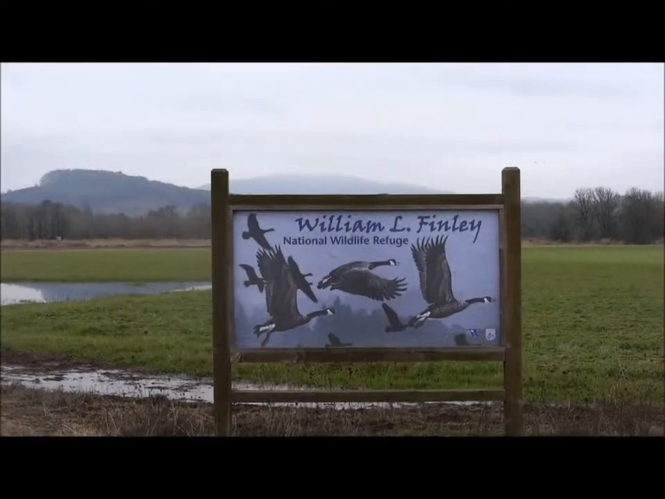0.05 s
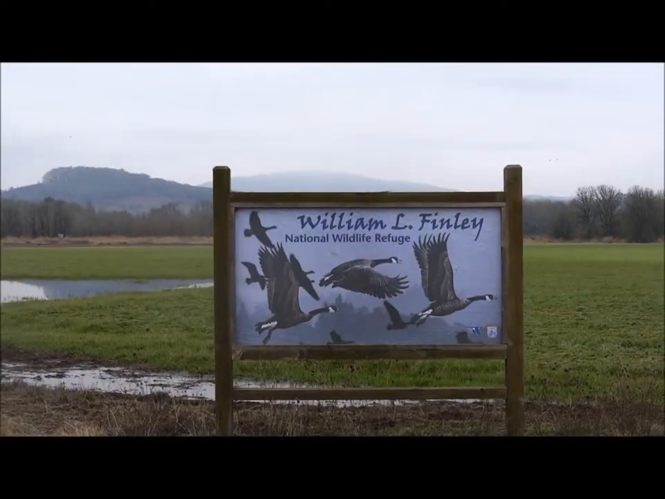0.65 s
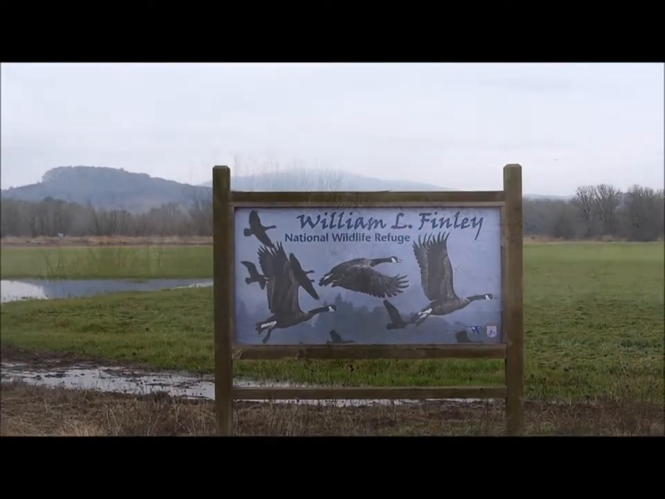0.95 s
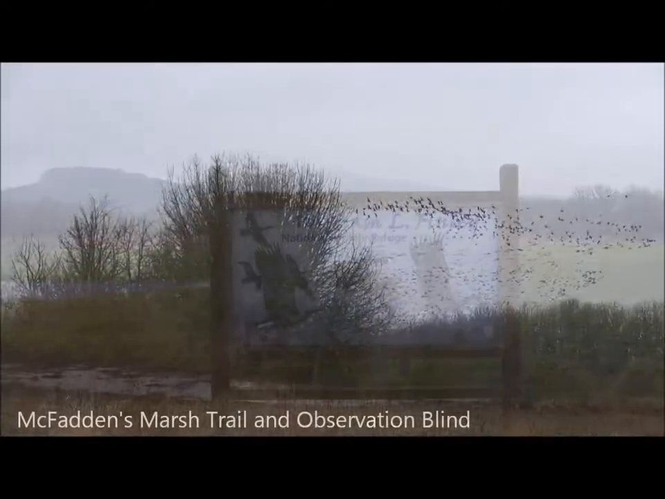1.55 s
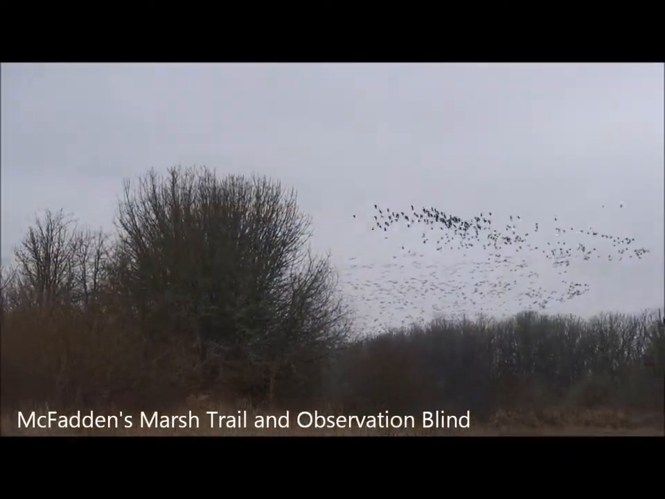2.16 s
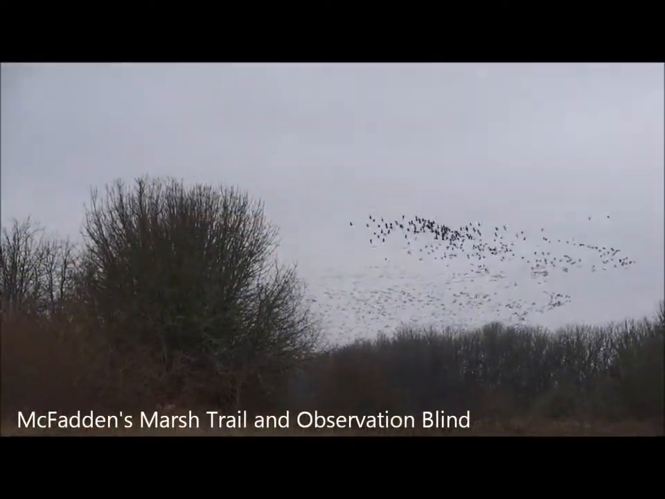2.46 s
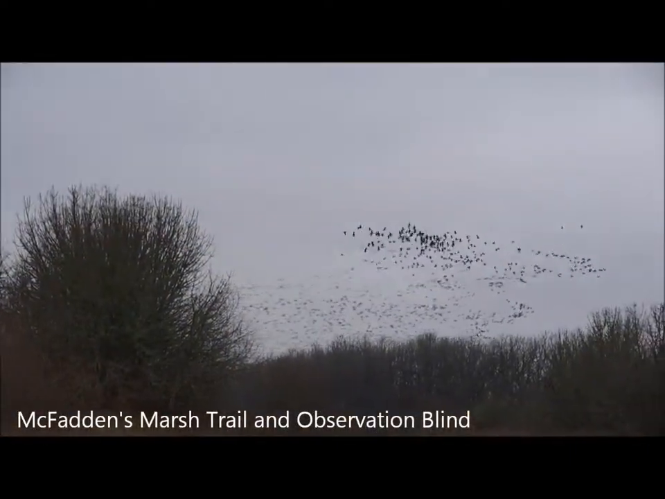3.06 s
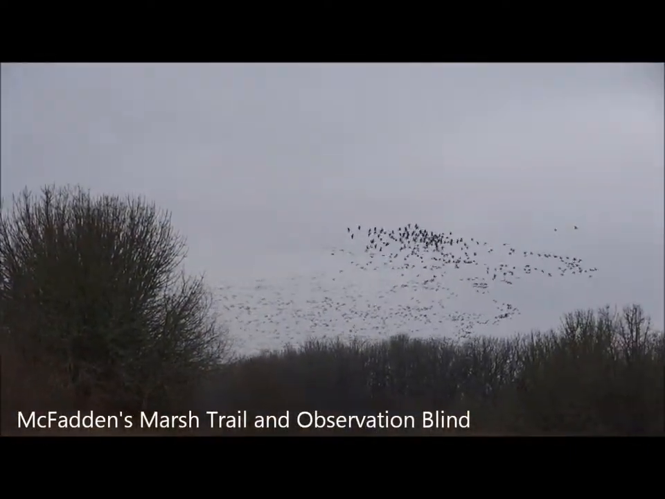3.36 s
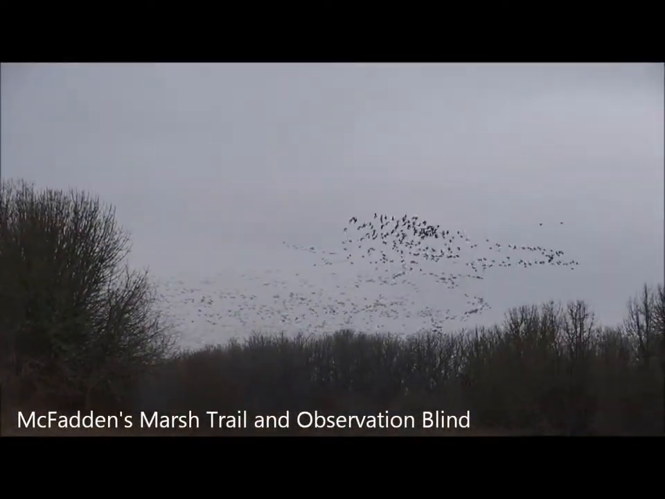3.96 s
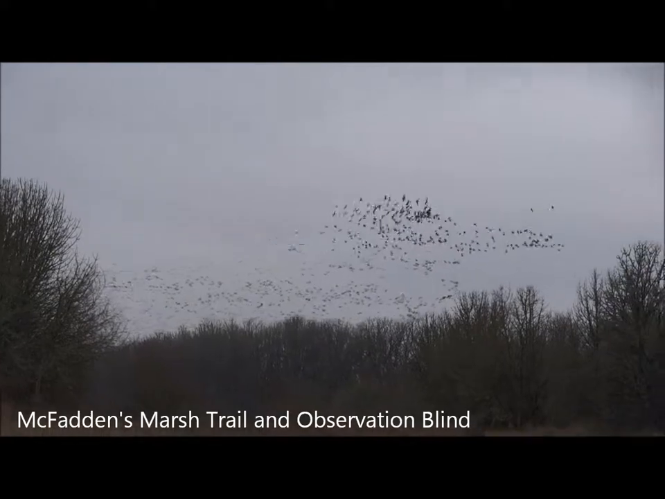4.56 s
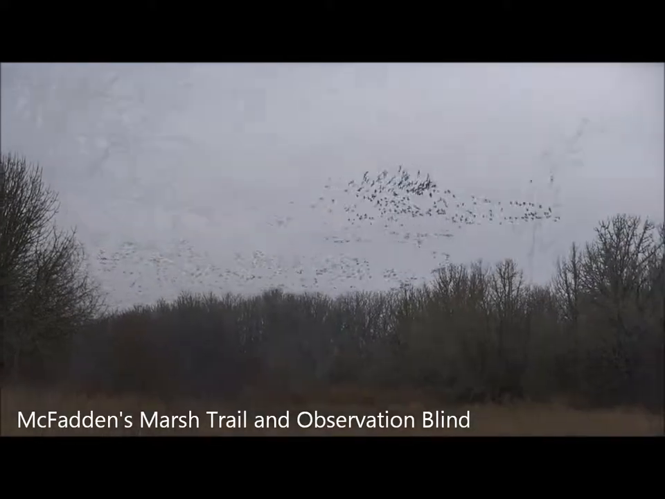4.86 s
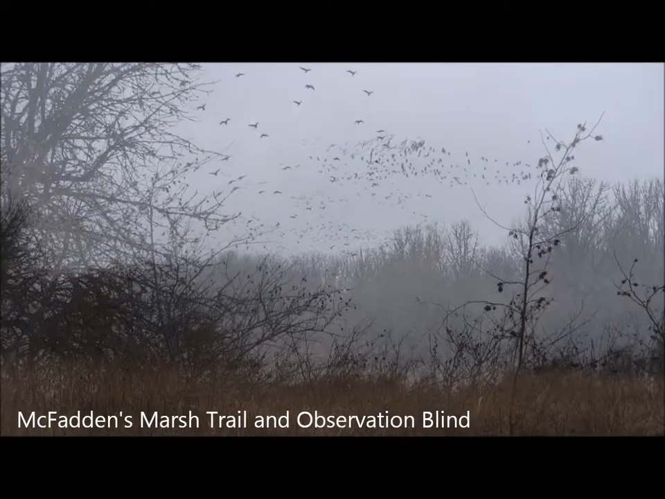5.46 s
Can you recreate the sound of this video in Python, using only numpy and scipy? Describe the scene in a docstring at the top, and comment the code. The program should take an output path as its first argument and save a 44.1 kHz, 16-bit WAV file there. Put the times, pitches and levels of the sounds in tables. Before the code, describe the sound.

A big flock of geese honks nonstop outdoors, jumping from distant to nearer to right overhead, with faint twig ticks and grass rustle.

```python
"""Hundreds of geese honk: first far off across a field, then flying over a marsh, at last close overhead.
Each honk is a harmonic series from the syrinx, arching in pitch and shaped by throat resonance.
The many far voices sum incoherently into a din, and single birds stand out of it.
Twigs tick, dry grass rustles and a small songbird trills faintly, over a few soft bumps,
a low outdoor rumble, a far-off drone and microphone hiss."""
import sys
import numpy as np
from scipy import signal
from scipy.fft import rfft, irfft, next_fast_len
from scipy.io import wavfile
from scipy.ndimage import uniform_filter1d

SR = 44100
rng = np.random.default_rng(int(sys.argv[2]) if len(sys.argv) > 2 else 0)


def transcribe(signal):
    """Save signal, clipped to [-1, 1], as a 16-bit WAV file at the path in sys.argv[1]."""
    frames = np.atleast_2d(signal).T
    limited = np.clip(frames, -1, 1)
    pcm = np.round(limited * 32767).astype(np.int16)
    wavfile.write(sys.argv[1], SR, pcm)


N = 247401
TIME = np.arange(N) / SR
CUTOFF_HZ = 15800
MARSH_S, MARSH_FADE_S = 1.28, .15
OVERHEAD_S, OVERHEAD_FADE_S = 5.27, .07


def from_db(db):
    """Amplitude ratio: tenfold for every 20 dB."""
    return 10 ** (np.asarray(db) / 20)


def unit_rms(x):
    """Normalisation to unit mean power."""
    return x / np.sqrt(np.mean(x ** 2) + 1e-20)


def at_hz(points, hz):
    """Interpolation of a spectrum on a logarithmic frequency axis."""
    freqs, values = np.transpose(points)
    return np.interp(np.log(hz + 1e-3), np.log(freqs), values)


def envelope(rows):
    """Gain interpolated in decibels: exponential growth or decay between points in time."""
    return from_db(np.interp(TIME, *np.transpose(rows)))


def swells(rows, attack_s, release_s):
    """Summed envelopes: each rises linearly up to its start, holds, then decays exponentially."""
    gain = 0
    for start, hold, db in rows:
        rise = np.clip(1 + (TIME - start) / attack_s, 0, 1)
        decay = np.exp(-np.maximum(TIME - start - hold, 0) / release_s)
        gain = gain + from_db(db) * rise * decay
    return gain


def places():
    """Equal-power cross-fades: the gains of the field, the marsh and the spot under the near birds."""
    marsh = np.clip((TIME - MARSH_S) / MARSH_FADE_S, 0, 1)
    overhead = np.clip((TIME - OVERHEAD_S) / OVERHEAD_FADE_S, 0, 1)
    return np.sqrt(1 - marsh ** 2), marsh * np.sqrt(1 - overhead ** 2), overhead


def add(track, start_s, sound):
    """Superposition of a sound on a track, dropping what falls outside."""
    at = int(start_s * SR)
    first, last = max(at, 0), min(at + len(sound), N)
    if last > first:
        track[first:last] += sound[first - at:last - at]


def noise():
    """Two uncorrelated white noises."""
    return rng.standard_normal((2, N))


def waver(length, rate_hz):
    """Random modulation: straight lines between Gaussian values of unit spread."""
    steps = np.arange(length) * rate_hz / SR
    return np.interp(steps % 255, np.arange(256), rng.standard_normal(256))


# Each row: frequency in Hz, correlation of left and right from 0 to 1.
COHERENCE = [(40, 1), (95, 0.99), (160, 0.9), (300, 0.43), (550, 0.8), (1200, 0.98), (12000, 0.79)]

def coloured(pair, spectrum):
    """Spectral shaping and mid-side mixing turn two unrelated signals into stereo of unit power."""
    size = next_fast_len(N + 4096)
    hz = np.arange(size // 2 + 1) * SR / size
    alike = np.clip(at_hz(COHERENCE, hz), 0, 1)
    shaped = rfft(pair, size) * from_db(at_hz(spectrum, hz))
    mid, side = irfft(shaped * np.sqrt([1 + alike, 1 - alike]), size)[:, :N]
    return unit_rms(np.array([mid + side, mid - side]))


# Each row: frequency in Hz, relative spectral density in dB.
HISS_SPECTRUM = [(300, -25), (1000, 24.5), (3000, -35.5), (5000, 2), (10000, 3.5), (15000, 4)]

def hiss(level_db):
    """Microphone self-noise is a stationary random signal."""
    return from_db(level_db) * coloured(noise(), HISS_SPECTRUM)


# Each row: frequency in Hz, relative spectral density in dB.
RUMBLE_SPECTRUM = [(12, -38), (20, -8.5), (86, 5), (116, 0.5), (203, -10), (304, -11.5), (370, -13.5),
                   (450, -22), (580, -14), (990, -120)]
# Levels in dB: in the field, at the marsh, under the near birds.
RUMBLE_LEVELS = (-50, -45.5, -45.5)

def rumble():
    """Outdoor rumble is noise with its power concentrated at low frequencies."""
    gain = sum(from_db(db) * here for db, here in zip(RUMBLE_LEVELS, places()))
    return gain * coloured(noise(), RUMBLE_SPECTRUM)


# Each row: start in seconds, hold in seconds, level in dB.
DRONE_SWELLS = [(4.1, 0.44, -54.5), (4.3, 0.038, -53), (5.35, 0.28, -49.5)]
# Each row: frequency in Hz, relative spectral density in dB.
DRONE_SPECTRUM = [(150, -53), (240, -6), (310, 3), (370, -10), (600, -60)]

def drone():
    """Narrow-band noise has a vague pitch, heard as a faint far-off drone."""
    return swells(DRONE_SWELLS, attack_s=0.054, release_s=0.092) * coloured(noise(), DRONE_SPECTRUM)


# Each row: start in seconds, hold in seconds, level in dB.
TRILL_SWELLS = [(4.285, .2, -59), (4.68, 0.087, -61)]
# Each row: centre frequency in Hz, frequency deviation in Hz, relative level in dB.
TRILL_TONES = [(3850, 170, -1), (4970, 150, 0)]

def songbird(notes_per_s):
    """Frequency modulation makes two tones buzz; amplitude modulation pulses them into a trill."""
    tones = 0
    for hz, deviation, db in TRILL_TONES:
        pitch = hz + deviation * waver(N, rate_hz=700)
        tones = tones + from_db(db) * np.sin(2 * np.pi * np.cumsum(pitch) / SR)
    pulsing = 1 + 0.35 * np.sin(2 * np.pi * notes_per_s * TIME)
    return swells(TRILL_SWELLS, attack_s=0.017, release_s=.06) * unit_rms(tones * pulsing)


# Each row: start in seconds, level in dB, ring frequency in Hz, time to decay by 60 dB in seconds.
SOFT_BUMPS = [(2.94, -37.5, 234, 0.077), (3.5, -33.5, 38, 0.27), (3.788, -27, 250, 0.039)]

def bumps():
    """A bump is a low damped oscillation, softened by a gradual onset."""
    track, t = np.zeros(N), np.arange(SR // 3) / SR
    onset = 1 - np.exp(-t / 0.0022)
    for start, db, hz, t60 in SOFT_BUMPS:
        add(track, start, from_db(db - 60 * t / t60) * np.sin(2 * np.pi * hz * t) * onset)
    return track


# The grass stirs and settles. Each row: time in seconds, level in dB.
GRASS_LEVELS = [(1.3, -50), (1.76, -35.5), (1.98, -41), (2.8, -41.5), (3.15, -45), (3.8, -47), (5.2, -54)]
# Brushes against it. Each row: start in seconds, hold in seconds, level in dB.
GRASS_BRUSHES = [(2.078, 0.054, -29.5), (2.19, .02, -39)]
# Each row: frequency in Hz, relative spectral density in dB.
GRASS_SPECTRUM = [(150, -13.5), (500, -2.5), (1300, 7.5), (2200, 0), (3400, -12.5), (4200, -19.5),
                  (5500, -16.5), (7000, -24), (10500, -23), (12500, -24.5), (15000, -34)]

def grass(snaps_per_s, size_db):
    """Dry stalks brush together in random impulses, which merge into a crackle as shot noise."""
    snaps = noise() * (rng.random(N) < snaps_per_s / SR)
    sizes = from_db(size_db * np.minimum(rng.exponential(1, N), 4))
    gain = envelope(GRASS_LEVELS) + swells(GRASS_BRUSHES, attack_s=0.011, release_s=0.017)
    return gain * coloured(snaps * sizes, GRASS_SPECTRUM)


# Each row: start in seconds, ring level in dB, ring frequency in Hz,
# time to decay by 60 dB in seconds, amplitude ratio of crack to ring.
TWIG_TICKS = [(1.3833, -39.5, 6570, 0.0071, 2.3), (1.5995, -36, 13000, 0.0059, 0.52),
              (1.7615, -16.5, 2840, 0.0048, .06), (2.4658, -12, 2620, 0.0066, 0.018),
              (2.524, -24, 2800, 0.013, 0.045), (2.9418, -26.5, 2700, 0.016, 0.045),
              (3.604, -26, 7400, 0.0089, 0.17), (4.112, -33, 7500, 0.0028, 0.18),
              (4.12, -38.5, 5150, 0.0063, .15)]

def twigs():
    """A twig ticks as a heavily damped resonance with a broadband crack."""
    track, t = np.zeros(N), np.arange(SR // 3) / SR
    for start, db, hz, t60, crack in TWIG_TICKS:
        tick = np.sin(2 * np.pi * hz * t) + crack * rng.standard_normal(len(t))
        add(track, start, from_db(db - 60 * t / t60) * tick)
    return track


def open_air(x, t60, width=0.26):
    """Scattering by trees and ground gives a dull, decaying tail, different on each side."""
    t = np.arange(SR // 2) / SR
    tail = rng.standard_normal((2, len(t))) * from_db(-60 * t / t60) * (1 - np.exp(-t / 0.019))
    tail = tail / np.sqrt(np.sum(tail ** 2, axis=1, keepdims=True))
    scattered = signal.fftconvolve(x[None], tail, axes=1)[:, :N]
    mid, side = signal.sosfilt(signal.butter(1, 4000, fs=SR, output="sos"), scattered)
    return np.array([mid + width * side, mid - width * side])


def honk(seconds, contour_hz, amplitudes, jitter, scoop, swell=0):
    """The syrinx oscillates in a harmonic series that arches in pitch and flutters in pitch and level."""
    u = np.linspace(0, 1, max(int(seconds * SR), 64))
    start, middle, end = contour_hz
    pitch = start + (end - start) * u + (2 * middle - start - end) * 2 * u * (1 - u)
    # the voice scoops up as pressure builds and drops as it runs out
    slack = np.exp(-u * 20) + np.exp((u - 1) * 20)
    pitch = pitch * (1 - scoop * slack) * (1 + jitter * waver(len(u), rate_hz=380))
    phase = (2 * np.pi * (np.cumsum(pitch) / SR + rng.random())).astype(np.float32)
    pressure = np.abs(np.sin(np.pi * u)).astype(np.float32)
    # high harmonics open up only while the pressure is high
    opening = 1 - swell * (1 - pressure)
    tone = sum(amplitude * opening ** (k - 1) * np.sin(k * phase + k * k)
               for k, amplitude in enumerate(amplitudes, 1))
    shimmer = 1 + 0.41 * waver(len(u), rate_hz=159.8)
    return tone * np.sqrt(pressure) * shimmer


def chorus(start_s, end_s, spectrum, pitch_hz, jitter, spread_db, din_db, count, harmonics):
    """Incoherent summation: many geese call at random, and the farthest blur into a din of noise."""
    calls = np.zeros(N)
    times = start_s + (end_s - start_s) * (np.arange(count) + rng.random(count)) / count
    birds, throats = rng.normal(size=(count, 5)), rng.normal(size=(count, harmonics))
    for start, (register, length, glide, arch, nearness), throat in zip(times, birds, throats):
        pitch = pitch_hz * np.exp(.25 * register)
        droop = 0.05 * (1 + 0.635 * arch)
        contour = pitch * np.array([1 - droop - 0.0449 * glide, 1, 1 - droop + 0.046 * glide])
        amplitudes = from_db(spread_db * np.clip(nearness, -2, 1.5) + 4.0 * np.clip(throat, -2, 1.5))
        partials = np.arange(1, harmonics + 1) * pitch
        # a goose's throat radiates its lowest partials weakly
        amplitudes = (amplitudes * np.minimum(partials / 900, 1) ** 2)[partials < CUTOFF_HZ]
        add(calls, start, honk(.08 * np.exp(0.3003 * length), contour, amplitudes, jitter, scoop=0.047))
    voices = coloured(np.array([calls, open_air(calls, t60=0.3)[0]]), spectrum)
    # so many birds overlap that their summed power changes only slowly
    power = uniform_filter1d(np.mean(voices ** 2, axis=0), int(.12 * SR))
    voices = voices / np.sqrt(np.abs(power) + 0.016)
    din = from_db(din_db)
    return (voices + din * coloured(noise(), spectrum)) / np.sqrt(1 + din ** 2)


# Timbre of each chorus. Each row: frequency in Hz, relative gain in dB.
FIELD_SPECTRUM = [(300, -14.5), (450, -14), (600, -3.5), (750, -1.5), (1000, 2), (1200, -7), (1450, -4),
                  (1700, -7), (2050, -3), (2300, -16), (2550, -46), (3100, -33), (4000, -30.5), (6000, -50)]
MARSH_SPECTRUM = [(300, -35), (430, -15), (560, -10), (730, -12.5), (930, 2), (1170, -7), (1400, 2.5),
                  (1680, -5), (1990, 0.5), (2400, -16.5), (3000, -14.5), (3500, -32.5), (5500, -36.5),
                  (8000, -43)]
OVERHEAD_SPECTRUM = [(300, -17.5), (560, -14.5), (750, -14.5), (1000, -1), (1200, -3), (1450, 0),
                     (2050, 0.5), (2500, -7), (3100, -10), (4100, -24.5), (6000, -19), (8000, -26),
                     (11000, -41), (15000, -52)]
# Swell of the two later choruses. Each row: time in seconds, relative level in dB.
MARSH_LEVELS = [(1.44, -32.5), (1.85, -31.5), (2.28, -32.5), (2.56, -29), (2.85, -33), (3.12, -31.5),
                (4.05, -30.7), (4.93, -29.5), (5.28, -30)]
OVERHEAD_LEVELS = [(5.32, -17), (5.33, -18.5), (5.412, -13), (5.526, -17), (5.6, -14)]

def flocks():
    """Three choruses follow one another, louder and brighter as the distance shrinks."""
    field = chorus(-.1, 1.5, FIELD_SPECTRUM, pitch_hz=689.6, jitter=0.0091,
                   spread_db=7.5, din_db=0.5, count=150, harmonics=5)
    marsh = chorus(1.15, 5.45, MARSH_SPECTRUM, pitch_hz=720, jitter=.007,
                   spread_db=4, din_db=-3, count=520, harmonics=7)
    overhead = chorus(5.15, 5.62, OVERHEAD_SPECTRUM, pitch_hz=853, jitter=.012,
                      spread_db=6.5, din_db=-1, count=48, harmonics=16)
    in_field, in_marsh, under_birds = places()
    return (from_db(-43.5) * field * in_field
            + from_db(0.5) * marsh * envelope(MARSH_LEVELS) * in_marsh
            + from_db(-3.5) * overhead * envelope(OVERHEAD_LEVELS) * under_birds)


def yelps(count, pitch_hz=885, length_s=0.0483, throat_hz=(1350, 3084), fall_db_per_octave=9):
    """Honk rows for weaker yelps in the flying flock: throat resonance selects the nearest harmonic."""
    rows = []
    low, high = throat_hz
    first_s = MARSH_S + MARSH_FADE_S
    for k, (when, tuning, register, length, glide, distance) in enumerate(rng.random((count, 6))):
        start = first_s + (OVERHEAD_S - first_s) * (k + when) / count
        pitch = pitch_hz * 2 ** (register - .5)
        strongest = max(round((low + (high - low) * tuning) / pitch), 1)
        db = -31.5 - fall_db_per_octave * np.log2(strongest * pitch / low) - 4 * distance
        rows.append((start, length_s * 2 ** (length - .5), pitch, 0.089 * (4 * glide - 2), strongest, db))
    return rows


def single_birds(honks, overtones, plain_hz, jitter, gain_db, echo_db, pan_db, uneven_db):
    """Throat resonance lifts one harmonic of each honk; a left-right level ratio gives its direction."""
    arch, strain_db_per_octave, field_loss_db = 0.023, 8, 10.5
    left, right = np.zeros((2, N))
    for start, length, pitch_hz, glide, strongest, db in honks:
        k = np.arange(1, int(min(overtones[-1][0], CUTOFF_HZ) / pitch_hz) + 1)
        throat_db = at_hz(overtones, k * pitch_hz) + uneven_db * (2 * rng.random(size=64) - 1)[:len(k)]
        # a higher voice is more strained and brighter; the long way across the field dulls it
        bright_db = strain_db_per_octave * np.log2(pitch_hz / plain_hz)
        bright_db -= field_loss_db * (start < MARSH_S)
        amplitudes = from_db(db + np.where(k == round(strongest), 0, bright_db + throat_db))
        contour = pitch_hz * np.array([1 - arch - glide / 2, 1, 1 - arch + glide / 2])
        note = honk(length, contour, amplitudes, jitter, scoop=0.021, swell=0.098)
        pan = from_db(pan_db * (2 * rng.random() - 1.5))
        add(left, start, note * pan)
        add(right, start, note / pan)
    echo = from_db(echo_db) * open_air((left + right) / 2, t60=0.48)
    return from_db(gain_db) * (np.array([left, right]) + echo)


# Birds that stand out, far off and overhead. Each row: start in seconds, length in seconds, pitch in Hz,
# glide as a fraction of the pitch, number of the strongest harmonic, its relative level in dB.
FAR_CALLS = [(0, 0.064, 718, -.08, 3, -38.5), (.09, 0.055, 700, 0.11, 3, -43),
             (.11, 0.067, 1020, -0.029, 3, -53), (.13, .08, 970, 0, 2, -39),
             (.44, 0.083, 810, -0.0048, 2, -45), (.865, 0.15, 730, .17, 2, -39),
             (.93, 0.059, 955, 0.043, 2, -31.5), (.975, .055, 834, -0.051, 2, -30.5),
             (1.06, 0.046, 724, 0.17, 3, -41), (1.09, 0.075, 766, -0.035, 2, -41.5),
             (1.15, 0.068, 720, .08, 3, -43.5), (1.43, 0.039, 1132, 0.092, 2, -32),
             (1.53, 0.092, 534, 0.062, 1, -40), (1.65, 0.067, 1002, 0, 2, -33),
             (1.76, .06, 948, -0.013, 2, -29), (2.13, 0.088, 616, 0.2, 2, -32.5),
             (2.21, .15, 539, -0.05, 1, -38), (2.35, 0.054, 1140, 0, 2, -35.5),
             (2.59, 0.067, 694, 0.028, 1, -37), (2.665, 0.036, 1410, -0.025, 2, -40),
             (2.73, 0.062, 674, -0.16, 2, -31), (2.91, 0.05, 760, 0, 3, -36),
             (2.97, .11, 572, .14, 1, -40.5), (3, 0.055, 782, -0.15, 1, -34.5),
             (3.06, 0.055, 990, -0.13, 3, -39), (3.1, 0.032, 720, 0.079, 3, -30),
             (3.14, 0.068, 1023, -0.033, 3, -41), (3.21, 0.055, 958, -0.033, 3, -36.5),
             (3.33, 0.067, 704, 0.1, 1, -37), (3.36, 0.058, 956, -.03, 3, -35.5),
             (3.39, .06, 1527, -.05, 2, -44), (3.495, 0.042, 738, 0.075, 3, -31.5),
             (3.53, 0.088, 805, -0.03, 2, -33.5), (3.645, 0.079, 678, 0.0093, 4, -36),
             (3.85, 0.037, 682, -0.097, 2, -29.5), (3.93, 0.052, 980, .01, 3, -37),
             (4.19, 0.13, 696, -0.057, 4, -37.5), (4.205, 0.097, 1055, 0, 2, -32.5),
             (4.315, .055, 687, -0.15, 2, -25), (4.67, 0.064, 716, -0.0074, 3, -32),
             (4.83, .14, 577, 0.26, 1, -38.5), (4.85, 0.053, 1006, .02, 2, -28),
             (4.91, 0.072, 1085, 0.11, 2, -28), (5, 0.065, 1114, 0.068, 2, -32.5),
             (5.16, .11, 924, .04, 2, -28)]
NEAR_CALLS = [(5.322, 0.038, 941, -.03, 2, -15.5), (5.33, 0.071, 1585, -0.012, 1, -18),
              (5.355, 0.094, 1001, 0.15, 2, -15.5), (5.38, 0.061, 725, 0.032, 3, -18),
              (5.383, 0.055, 1414, -.03, 1, -16), (5.41, 0.056, 1280, 0.017, 2, -18.5),
              (5.42, 0.051, 1180, 0.013, 2, -18.5), (5.43, 0.053, 788, -.04, 2, -20),
              (5.46, 0.07, 1580, -.05, 1, -26), (5.46, 0.051, 880, -0.012, 3, -24.5),
              (5.512, 0.055, 1053, .05, 2, -22.5), (5.55, .04, 680, -0.022, 2, -23),
              (5.56, 0.073, 1080, .07, 2, -13), (5.58, .06, 1116, 0.031, 2, -23)]
# Their other harmonics. Each row: frequency in Hz, base level against the strongest in dB.
FAR_HARMONICS = [(500, -8), (1000, -19.5), (2000, -14), (2600, -27), (3100, -12.5), (3600, -37),
                 (5800, -41), (9000, -54)]
NEAR_HARMONICS = [(600, -34), (1000, -8.5), (2000, -8), (3000, -7), (4400, -19), (5900, -12), (8000, -20.5),
                  (11000, -22.5), (15000, -38)]

def geese():
    """Single geese over the chorus: the nearer the bird, the higher the ratio of direct sound to echo."""
    far = single_birds(FAR_CALLS + yelps(count=24), FAR_HARMONICS, plain_hz=780, jitter=0.0033,
                       gain_db=-1.5, echo_db=-11.0, pan_db=2.0, uneven_db=6.5)
    near = single_birds(NEAR_CALLS, NEAR_HARMONICS, plain_hz=1330, jitter=.013,
                        gain_db=-.5, echo_db=-25, pan_db=-0.5, uneven_db=4.5)
    lean_left = from_db([[.4], [-.4]])
    return (flocks() + far + near) * lean_left


def scene():
    """Independent sources add by superposition: geese, a quiet background and small sounds."""
    return (geese() + rumble() + drone() + hiss(level_db=-57.5)
            + songbird(notes_per_s=50) + bumps() + twigs() + grass(snaps_per_s=11000, size_db=1.2))


def record(dry):
    """An elliptic low-pass filter cuts the highest treble steeply."""
    return signal.sosfilt(signal.ellip(10, .1, 80, CUTOFF_HZ, fs=SR, output="sos"), dry)


dry = scene()
out = record(dry)
transcribe(out)
```